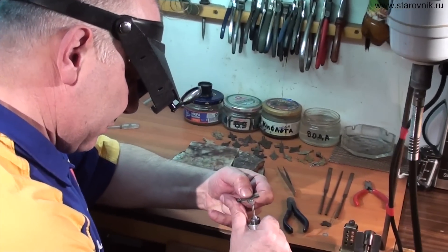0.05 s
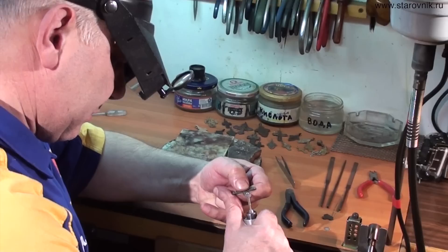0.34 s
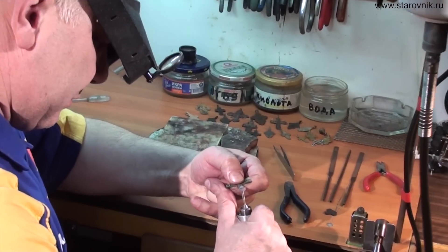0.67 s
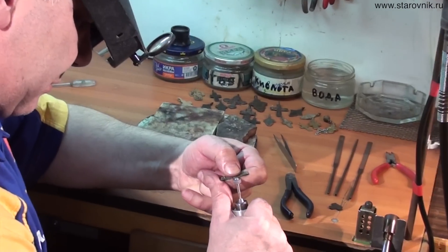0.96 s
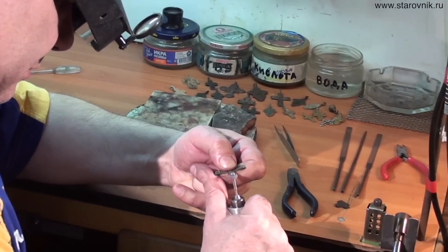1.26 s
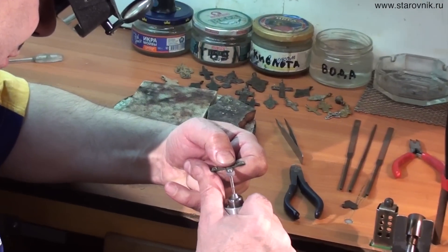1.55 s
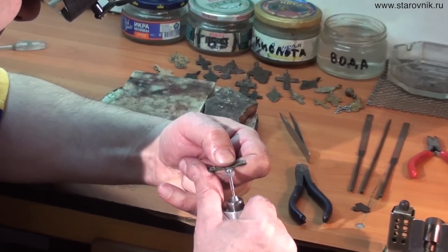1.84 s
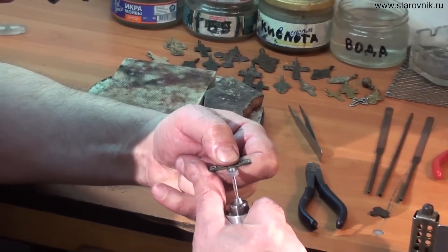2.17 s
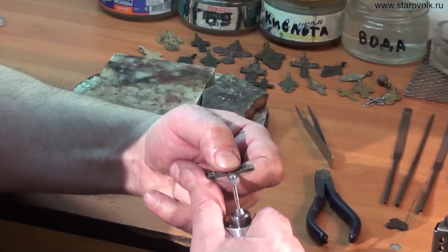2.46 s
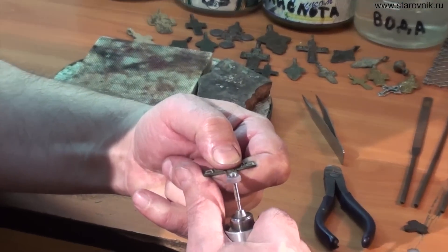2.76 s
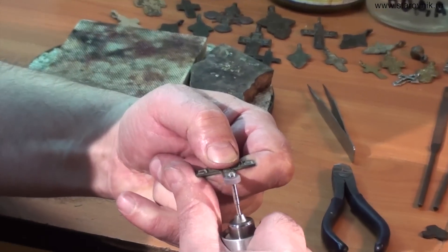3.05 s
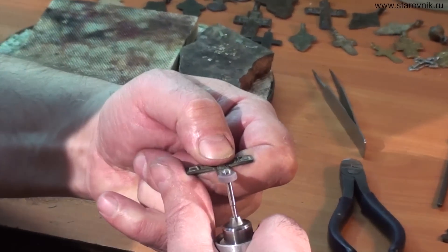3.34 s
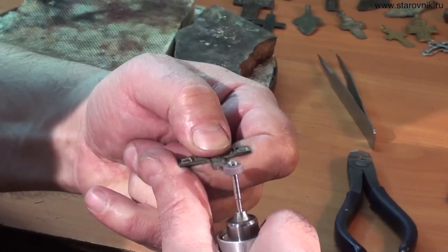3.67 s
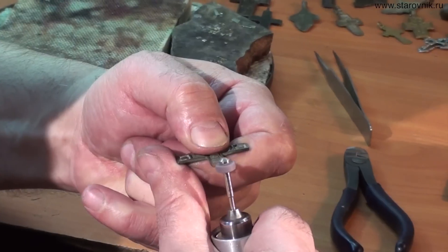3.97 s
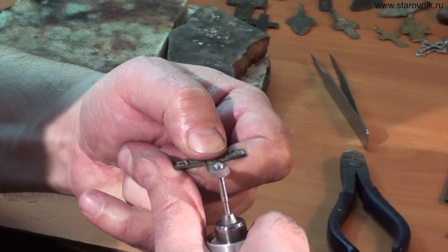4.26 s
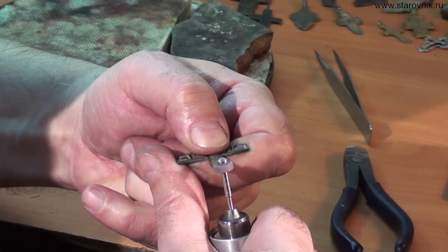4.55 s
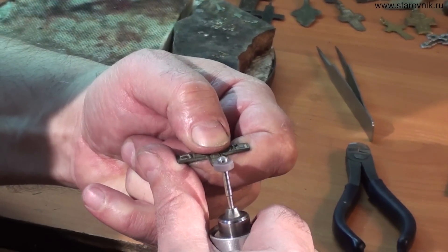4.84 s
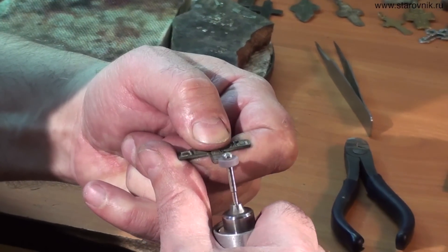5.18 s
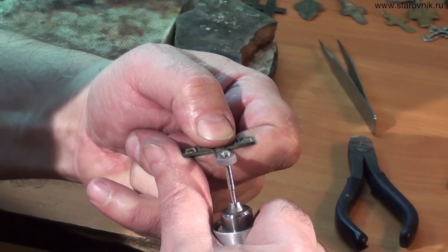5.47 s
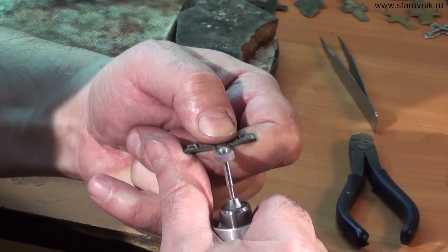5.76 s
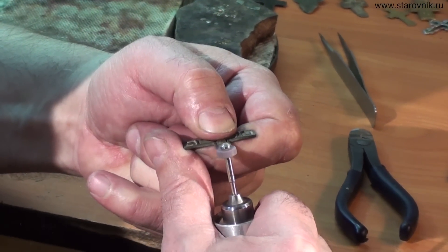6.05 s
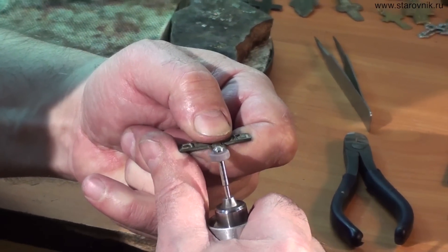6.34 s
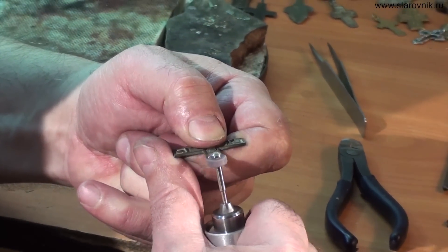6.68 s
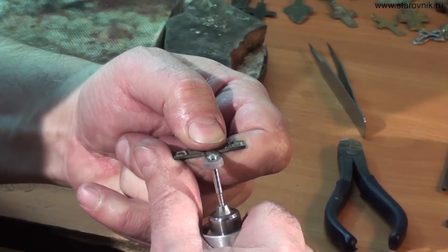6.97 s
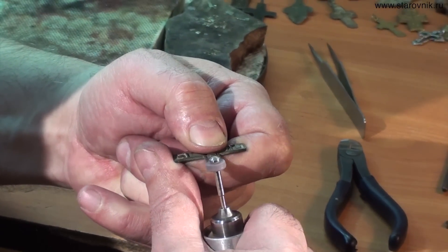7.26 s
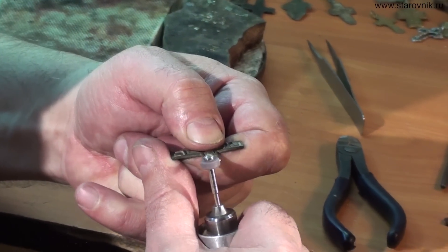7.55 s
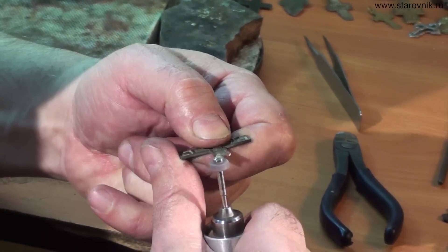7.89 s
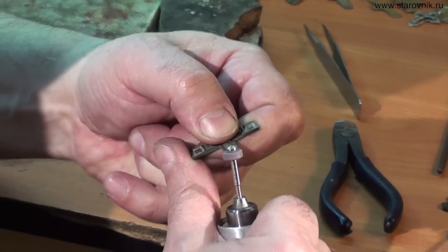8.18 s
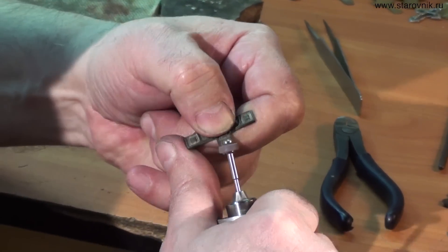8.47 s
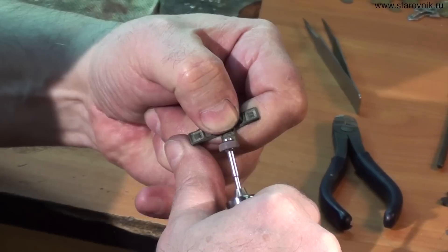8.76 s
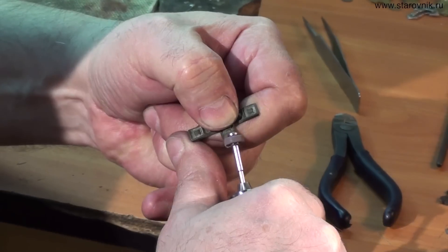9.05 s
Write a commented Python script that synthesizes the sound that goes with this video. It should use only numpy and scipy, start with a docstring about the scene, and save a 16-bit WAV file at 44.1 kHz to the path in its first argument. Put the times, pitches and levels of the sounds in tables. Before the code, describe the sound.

A small rotary tool speeds up, with a few dull knocks and soft scuffs on a workbench. Its wheel meets a hand-held piece of metal and grinds almost without pause: a high, uneven buzz over gritty hiss, with hoarse squeals and brief singing tones under pressure. The motor hums and whirrs underneath. Near the end the wheel lifts off and the motor slows. Heard close in a small room.

```python
"""A flexible-shaft rotary tool spins up and its small wheel grinds a hand-held piece of metal. The wheel
strikes once a turn, so the piece buzzes near 2 kHz over a hiss of grit, and sings when pressed. Underneath, the
drive hums, whirrs and hisses; at the end the wheel lifts off and the motor coasts down. A few dull knocks come
from the pedal and the swinging shaft, and scuffs from the workbench; a small room answers."""
import sys
import numpy as np
from scipy import signal
from scipy.fft import rfft, irfft, next_fast_len
from scipy.io import wavfile
from scipy.ndimage import map_coordinates

SR = 44100
rng = np.random.default_rng(int(sys.argv[2]) if len(sys.argv) > 2 else 0)


def file_out(sig):
    """Save sig as 16-bit WAV at sys.argv[1]."""
    # one column per channel
    cols = np.atleast_2d(sig).T
    # limit, then scale
    lim = np.clip(cols, -1, 1)
    pcm = np.round(lim * 32767).astype(np.int16)
    wavfile.write(sys.argv[1], SR, pcm)


N = 402191


def amp(db):
    """Decibels to gain."""
    return np.exp(np.asarray(db) * (np.log(10) / 20))

def unit(x):
    """Scale to rms 1."""
    return x / np.sqrt(np.mean(x ** 2) + 1e-20)

def noise():
    """Fresh white noise, as long as the scene."""
    return rng.standard_normal(N)

def clock():
    """Time of every sample in seconds."""
    return np.arange(N) / SR

def along(points, hz):
    """Read (Hz, value) points on a log frequency axis."""
    point_hz, values = np.transpose(points)
    return np.interp(np.log(hz + 1), np.log(point_hz + 1), values)

def curves(rows):
    """One automation curve for each column after the time."""
    times, *columns = np.transpose(rows)
    return [np.interp(clock(), times, column) for column in columns]

def wobble(rate):
    """A smooth random curve of rms 1, with `rate` knots a second."""
    knots = rng.standard_normal(N // 32)
    coarse_s = np.arange(0, N + 32, 32) / SR
    return unit(np.interp(clock(), coarse_s, map_coordinates(knots, [coarse_s * rate], mode="wrap")))

def swell(peak_s, length_s):
    """A bell-shaped fade in and out."""
    return np.exp(-2 * ((clock() - peak_s) / length_s) ** 2)

def strokes(rows, attack_s=0.016, release_s=0.018):
    """Each row rises, holds and falls; returns the gain, and any further columns as glides."""
    t, gain, glides = clock(), np.zeros(N), []
    for start, length, db, *held in rows:
        corners = np.cumsum([start, attack_s, max(length - attack_s, 0), release_s])
        gain += amp(db) * np.interp(t, corners, [0, 1, 1, 0])
        glides += [(start + attack_s, *held), (start + length, *held)]
    return gain, *curves(glides)

def filtered(x, response):
    """Pass x through a response given as a function of Hz."""
    size = next_fast_len(N + SR // 4)
    return irfft(rfft(x, size) * response(np.fft.rfftfreq(size, 1 / SR)), size)[..., :N]

def coloured(x, spectrum):
    """x through an EQ curve of (Hz, dB) points, at rms 1."""
    return unit(filtered(x, lambda hz: amp(along(spectrum, hz))))

def resonance(hz, centre_hz, width_hz):
    """Complex response of one mode."""
    return 1j * hz * width_hz / (centre_hz ** 2 - hz ** 2 + 1j * hz * width_hz)

def resonant_band(x, centre_hz, width_hz):
    """x twice through one resonance, at rms 1."""
    return unit(filtered(x, lambda hz: resonance(hz, centre_hz, width_hz) ** 2))

def treble_ripple(x, depth_db, spacing_hz=70):
    """A fixed, fine, random ripple of peaks and dips colours the treble."""
    knots = rng.standard_normal(1024)
    ripple = lambda hz: map_coordinates(knots, [hz / spacing_hz], mode="wrap")
    return filtered(x, lambda hz: amp(depth_db * np.minimum(hz / 8000, 1) * ripple(hz)))


def rumble():
    """A faint, low bed of noise."""
    return amp(-63.5) * coloured(noise(), [(15, -14), (33, -4), (55, -6), (150, -8), (600, -50)])

# The room's decay. Each row: frequency in Hz, seconds to fall 60 dB.
ROOM_DECAY = [(200, 0.5), (2000, .35), (12000, 0.05)]
# Stereo width of the tail. Each row: frequency in Hz, side against mid in dB.
TAIL_WIDTH = [(100, -22), (500, -8), (2500, -9), (6000, -2), (9000, -8.5), (13000, -103)]
# Placement of the direct sound. Each row: frequency in Hz, lead of left over right in radians.
LEFT_LEAD = [(0, 0.81), (1030, -0.57), (2930, -0.35), (5000, -0.36), (10000, 0)]
def room(x, wet_db=-14):
    """Close walls add a short tail; the direct sound arrives slightly out of step left and right."""
    band_hz, t, spectra = signal.stft(rng.standard_normal((2, SR // 3)), SR, nperseg=256)
    decay = amp(-60 * t / along(ROOM_DECAY, band_hz)[:, None])
    _, tail = signal.istft(spectra * decay, SR, nperseg=256)
    tail /= np.linalg.norm(tail[0])
    mid, side = signal.fftconvolve(x[None], tail, axes=1)[:, :N] * amp(wet_db)
    side = filtered(side, lambda hz: amp(along(TAIL_WIDTH, hz)))
    direct = filtered(x, lambda hz: np.exp(.5j * np.outer([1, -1], along(LEFT_LEAD, hz))))
    return direct + np.array([mid + side, mid - side])

# Soft scuffs at the bench. Each row: peak time in seconds, length in seconds, level in dB.
BENCH_SCUFFS = [(.01, 0.29, -30), (0.322, 0.043, -32), (0.39, 0.049, -33), (0.517, 0.051, -26.5),
                (8.045, 0.025, -25.5), (8.099, 0.033, -23.5)]
def scuffs():
    """Short uneven rubs in one hollow resonance."""
    envelope = sum(amp(db) * swell(peak, length) for peak, length, db in BENCH_SCUFFS)
    slips = noise() * amp(2.2 * wobble(89.8))
    return envelope * resonant_band(slips, centre_hz=588, width_hz=290)

# Dull knocks of the pedal and the flexible shaft. Each row: start in seconds, relative level in dB.
DULL_KNOCKS = [(0.053, -23.5), (.082, -27), (.856, -21.5), (0.877, -21.5)]
# The ring of the knocks. Each row: frequency in Hz, relative level in dB, seconds to fall 60 dB.
KNOCK_MODES = [(163, -9.5, 0.33), (317, -6, 0.17), (470, 7, 0.026), (668, 0, 0.04), (940, 6, 0.11),
               (1350, 5, 0.049)]
def knocks(trim_db=-1, thud_db=1, thud_t60=0.13, attack_s=0.0048):
    """Every knock is a dull thud that rings the same few modes at new strengths."""
    out, t = np.zeros(N + SR), np.arange(SR // 2) / SR
    dull_noise = coloured(noise(), [(60, -25), (170, -5), (1100, 4), (2500, -30)])
    attack = 1 - np.exp(-t / attack_s)
    for start, db in DULL_KNOCKS:
        span = slice(round(start * SR), round(start * SR) + len(t))
        ring = sum(amp(mode_db + rng.normal(0, 3.2) - 60 * t / t60) * np.sin(2 * np.pi * hz * t)
                   for hz, mode_db, t60 in KNOCK_MODES)
        thud = amp(thud_db - 60 * t / thud_t60) * dull_noise[span]
        out[span] += amp(db + trim_db) * (ring + thud) * attack
    return out[:N]

# Feather-light contacts. Each row: peak time in seconds, length in seconds, level in dB, pitch in Hz.
LIGHT_TOUCHES = [(0.15, 0.14, -38, 1780), (0.218, 0.1, -35, 1088)]
def light_touches():
    """The idling wheel brushes the piece, which sings faintly in one narrow resonance."""
    return sum(amp(db) * swell(peak, length) * resonant_band(noise(), hz, width_hz=70)
               for peak, length, db, hz in LIGHT_TOUCHES)

# Brief grazes. Each row: start in seconds, seconds to fall 60 dB, scrape level in dB, its centre in Hz.
EDGE_GRAZES = [(0.026, 0.12, -21, 2840), (0.098, 0.053, -26, 7900), (8.53, 0.2, -29, 7000),
               (8.551, 0.4, -25.5, 3300)]
def grazes():
    """The wheel catches an edge for an instant and the metal pings."""
    scrapes, t = np.zeros(N), clock()
    for start, t60, db, centre_hz in EDGE_GRAZES:
        scratch = noise() * amp(5 * wobble(400))
        envelope = amp(db - 60 * np.abs(t - start) / t60) * (t > start)
        scrapes += envelope * resonant_band(scratch, centre_hz, width_hz=1.5 * centre_hz)
    return filtered(scrapes, lambda hz: 1 + 3.2 * resonance(hz, centre_hz=3360, width_hz=54))

# Spin-up and coast-down. Each row: time in seconds, speed in turns per second.
SHAFT_SPEED = [(0, 88), (.3, 96), (.65, 109), (.8, 122), (1, 136), (1.25, 149.3), (1.53, 160), (2, 172.5),
               (2.5, 179.3), (3.3, 188.5), (4.6, 197.3), (6, 199.5), (7.1, 200), (7.8, 202.3), (8.05, 204),
               (8.36, 187), (8.7, 171), (9.12, 152.5)]
def shaft():
    """Speed, and angle in turns; the springy shaft winds and unwinds a little."""
    speed, = curves(SHAFT_SPEED)
    speed *= 1 + 0.001686 * wobble(14) + 0.00398 * wobble(130)
    return speed, np.cumsum(speed) / SR

# The housing's hollow tone. Each row: centre in Hz, width in Hz, level in dB.
HOUSING_BANDS = [(483.6, 60, -45), (1082, 110, -43.5), (1326, 79, -44.5), (2674, 88, -50)]
def housing_whirr():
    """The housing whirrs steadily in a few narrow bands."""
    return sum(amp(db) * resonant_band(noise(), hz, width) for hz, width, db in HOUSING_BANDS)

# Tone of the drive's hiss. Each row: frequency in Hz, relative level in dB.
HISS_EQ = [(60, -50), (130, -41), (190, -14), (290, -1), (400, -9.5), (680, -0.5), (980, -2.5), (1330, 4.5),
           (1500, -2.5), (1750, 2), (2800, -0.5), (5200, -5.5), (7800, 1), (10000, -5), (12000, -19),
           (16000, -22)]
def drive_hiss(speed, turns, full_speed=200, full_speed_db=-22, db_per_doubling=9):
    """Motor brushes and bearings hiss, louder with speed, pulsing lightly once a turn."""
    friction = noise() * (1 + 0.11 * np.cos(2 * np.pi * turns))
    level_db = full_speed_db + db_per_doubling * np.log2(speed / full_speed) + 1.07 * wobble(18)
    return amp(level_db) * coloured(treble_ripple(friction, depth_db=1.5), HISS_EQ)

# Resonances of the motor's mount. Each row: centre in Hz, width in Hz, peak gain in dB.
MOUNT_MODES = [(160, 30, -51), (205, 14, -51), (344, 49, -44.5), (378, 18.8, -44.5), (476, 66, -39),
               (574, 24, -39.5), (850, 450, -49)]
def mount_gain(hz):
    """The hum swells as it sweeps through the modes of the mount."""
    grid_hz = np.arange(SR // 16)
    power = sum(np.abs(amp(db) * resonance(grid_hz, centre, width) ** 2) ** 2
                for centre, width, db in MOUNT_MODES)
    return np.interp(hz, grid_hz, np.sqrt(power))

# The hum's partials. Each entry: pitch as a multiple of the shaft speed.
HUM_ORDERS = [1, 2, 2.56, 3, 4, 5, 6]
# Their balance. Each entry: level in dB going into the mount.
HUM_LEVELS = [.5, 2, -6.5, -1, -2, 2.5, 6.5]
def drive_hum(speed, turns):
    """Unbalance shakes the mount at a few multiples of the shaft speed."""
    angle = turns + .01 * wobble(60)  # play in the bearings
    hum = np.zeros(N)
    for order, db in zip(HUM_ORDERS, HUM_LEVELS):
        gain = mount_gain(order * speed) * amp(db + 2 * wobble(7) + 2 * wobble(45))
        hum += np.sqrt(2) * gain * np.sin(2 * np.pi * order * angle)
    return hum * np.minimum(speed / 145, 1) ** 4  # a slow shaft hardly shakes its mount

def chips(per_second=220, spread_db=3):
    """Tiny bright ticks of metal breaking away, their loudness coming in flurries."""
    size = 2 * np.tanh((noise() + wobble(6.4)) / 2)
    ticks = (rng.random(N) < per_second / SR) * amp(spread_db * size)
    return coloured(ticks, [(1500, -23), (4000, 22), (12000, -14), (16000, -9)])

def surging(x, depth_db=1.5, rate=9):
    """The angle of the cut keeps changing, so each treble band swells by itself, the highest most."""
    centres_hz = [3000, 5600, 7500, 11500]
    crossover = lambda hz: np.array([np.interp(hz, centres_hz, row) for row in np.eye(len(centres_hz))])
    bands = filtered(x, crossover)
    return unit(sum(band * amp(depth_db * hz / 7500 * wobble(rate))
                    for hz, band in zip(centres_hz, bands)))

def rim_grains(speed, turns, states_per_s=20, places=2048):
    """The same grains on the rim return each turn and slowly wear away."""
    strength, drift = rng.standard_normal((2, 200, 100))  # 200 states of wear, 100 harmonics
    phase = 2 * np.pi * rng.random(drift.shape[1]) + .7 * np.cumsum(drift, axis=0)
    rim = unit(irfft(amp(3 * strength) * np.exp(1j * phase), places))
    wear = clock() * states_per_s
    state, blend = wear.astype(int), wear % 1
    place = (turns % 1 * places).astype(int) % places
    grains = unit((1 - blend) * rim[state, place] + blend * rim[state + 1, place])
    in_groove = np.interp(speed, [110, 150], [0, 1])  # a slow wheel does not keep to its groove
    return np.sqrt(in_groove) * grains + np.sqrt(1 - in_groove) * noise()

# The metal's ring. Each row: centre in Hz, width in Hz, linear gain added on top of the grit.
METAL_MODES = [(2800, 50, .7), (3190, 50, .5), (3980, 50, .5), (5410, 50, .8), (5740, 60, .6)]
# Tone of the grit. Each row: frequency in Hz, relative level in dB.
GRIT_EQ = [(700, -56), (1370, -10), (1500, -11), (1620, -3), (1850, -1), (2450, -9), (3100, -4),
           (4800, -8.5), (7400, -5.5), (9000, -14), (10500, -19.5), (13300, -23), (16000, -26)]
def grit(speed, turns, groove_share=.84, fade_hz=8500, bite_db=2.5):
    """The rim's grains rasp and ring the metal; fresh chips add hiss."""
    repeating = lambda hz: groove_share / (1 + (hz / fade_hz) ** 4)  # fine grains never cut twice alike
    rasp = filtered(rim_grains(speed, turns), lambda hz: np.sqrt(repeating(hz)))
    hiss = filtered(noise(), lambda hz: np.sqrt(1 - repeating(hz)))
    # the high side of the wheel bites suddenly, then lets go
    bite = amp(bite_db * unit(np.exp(-(turns % 1) / 0.26)) + 1.14 * wobble(45))
    force = treble_ripple(rasp + hiss, depth_db=4) * bite
    metal = lambda hz: 1 + sum(gain * resonance(hz, centre, width) for centre, width, gain in METAL_MODES)
    return coloured(filtered(force, metal), GRIT_EQ)

RUB_CHATTER = .22  # roughness of plain rubbing, 0-1
def harmonic(turns, order, chatter):
    """One harmonic of the wheel's blows; chatter shakes its strength and its phase."""
    shake = amp((1.1 + 3 * chatter) * wobble(50))
    slip = 1.8 * chatter * wobble(110)
    return np.sqrt(2) * shake * np.cos(2 * np.pi * (order * turns + rng.random()) + slip)

# Hoarse squeals. Each row: start in seconds, length in seconds, level in dB, pitch in shaft multiples.
WHEEL_SQUEALS = [(1.22, 0.6, -27.5, 21.3), (1.85, 0.97, -29, 23.6), (6.1, 0.41, -30, 28),
                 (7.18, 0.57, -29, 27.6)]
def wheel_squeal(turns):
    """The thin wheel sings hoarsely on a few neighbouring high harmonics."""
    envelope, centre_order = strokes(WHEEL_SQUEALS, attack_s=0.064, release_s=0.088)
    cluster = sum(harmonic(turns, order, RUB_CHATTER) / (1 + (order - centre_order) ** 2)
                  for order in range(19, 31))
    return envelope * unit(cluster)

# Tone of the buzz. Each row: frequency in Hz, relative level in dB.
BUZZ_EQ = [(1200, -22), (1400, -10), (1490, -14), (1590, -3.5), (1700, -3), (1800, -2.5), (2000, 1),
           (2100, 0), (2200, -8), (2390, -1), (2600, -18)]
# The piece is rubbed along the wheel. Each row: start in seconds, length in seconds, level in dB.
RUB_STROKES = [(.79, 0.13, -20.5), (1.08, .3, -26), (1.38, 1.73, -25), (3.21, .6, -23), (3.82, 0.18, -26),
               (4.05, 0.27, -24), (4.43, .57, -26), (5.07, .98, -26.5), (6.06, 1.75, -24.5)]
# The hand leans harder and the wheel catches. Each row: start in seconds, length in seconds,
# level in dB, resonance of the gripped piece in Hz, chatter from 0 to 1.
HARD_PRESSES = [(1.407, 0.17, -21, 1590, 0), (1.742, .17, -20.5, 1840, 0), (1.936, .11, -22, 1730, 0.2),
                (2.05, .09, -23, 2090, 0), (2.158, .09, -22.5, 1935, 0), (2.276, .035, -19, 2110, 0.3),
                (2.28, 0.11, -23.5, 1590, 0), (2.318, 0.024, -18, 1950, .3), (2.56, .025, -18, 2160, .3),
                (2.585, 0.089, -23, 1980, 0.4), (2.86, 0.072, -24, 1840, 0.15),
                (2.96, .152, -19.5, 1860, 0), (3.62, 0.052, -25, 2100, 0), (3.725, 0.057, -20, 2110, 0.1),
                (4.108, .2, -23, 1940, 0.26), (4.452, 0.57, -21, 1970, .2), (5.096, 0.93, -26, 1990, 0.2),
                (6.07, 0.5, -21.5, 2000, 0.22), (6.54, 0.055, -21.5, 1800, 0.9),
                (6.655, 0.058, -16.5, 1960, .5), (7.214, 0.18, -22.5, 1810, 0.23),
                (6.983, .83, -24.5, 2010, 0.36), (7.537, 0.32, -25, 1820, .6)]
def piece_buzz(speed, turns, rub, tremor_db=1.2):
    """One blow a turn makes the piece buzz; pressed, it sings on the harmonic nearest its resonance."""
    orders = np.arange(7, 19)
    colour = amp(along(BUZZ_EQ, np.outer(orders, speed))) ** 2
    tremor = amp(tremor_db * wobble(13))  # the fingers never hold quite still
    powers = (rub * tremor) ** 2 * colour / colour.sum(axis=0)
    roughness = RUB_CHATTER * powers
    for start, length, db, hz, chatter in HARD_PRESSES:
        nearest = np.argmin(np.abs(orders * speed[int(start * SR)] - hz))
        note, = strokes([(start, length, db)])
        powers[nearest] += note ** 2
        roughness[nearest] += chatter * note ** 2
    chatters = roughness / (powers + 1e-12)
    # a slow wheel skips, so its blows come unevenly
    skip = np.interp(speed, [116, 134], [.028, .0015]) * wobble(110)
    return sum(np.sqrt(power) * harmonic(turns + skip, order, chatter)
               for order, power, chatter in zip(orders, powers, chatters))

# Depth of the cut, a fader ride on grit and chips. Each row: time in seconds, relative level in dB.
CUT_DEPTH = [(.6, -17), (0.8, -19.5), (1.7, -17.5), (1.83, -18), (4.31, -19.5), (5.65, -16.5), (6.55, -18),
             (6.69, -20.5), (6.74, -17), (7.78, -20.5)]
TOUCH_S, SETTLE_S = 0.53, 0.19  # when the wheel meets the metal, and how long it takes
LIFT_S, LEAVE_S = 7.8, 0.04  # when it lifts off, and how long it takes
def grinding(speed, turns, grit_trim_db=-2.5, rub_boost_db=1.5):
    """Buzz, squeal and grit sound while the wheel is on the metal; each rub raises buzz and grit."""
    contact, = curves([(TOUCH_S, 0), (TOUCH_S + SETTLE_S, 1), (LIFT_S, 1), (LIFT_S + LEAVE_S, 0)])
    rub, = strokes(RUB_STROKES)
    cut_db, = curves(CUT_DEPTH)
    grit_db = cut_db + grit_trim_db + rub_boost_db * rub / rub.max()
    tones = piece_buzz(speed, turns, rub) + wheel_squeal(turns)
    abrasion = surging(grit(speed, turns)) + amp(-12) * chips()
    return contact * (tones + amp(grit_db) * abrasion)

def scene():
    """Tool, metal and bench in the room, over a faint rumble."""
    speed, turns = shaft()
    drive = drive_hum(speed, turns) + housing_whirr() + drive_hiss(speed, turns)
    near = drive + grinding(speed, turns) + grazes() + knocks() + scuffs() + light_touches()
    return rumble() + room(near)

def record(dry, top_hz=16050):
    """A brick-wall low-pass takes off the very top."""
    return filtered(dry, lambda hz: hz < top_hz)


dry = scene()
out = record(dry)
file_out(out)
```